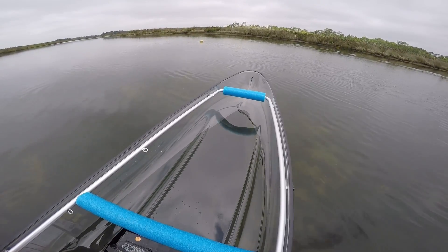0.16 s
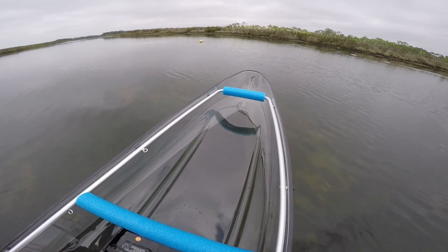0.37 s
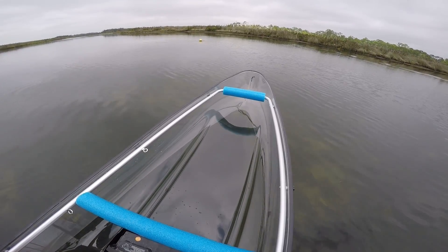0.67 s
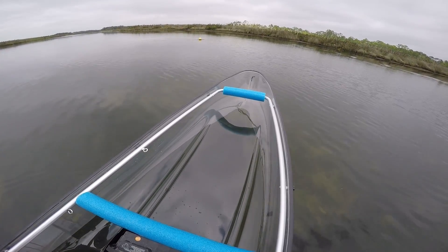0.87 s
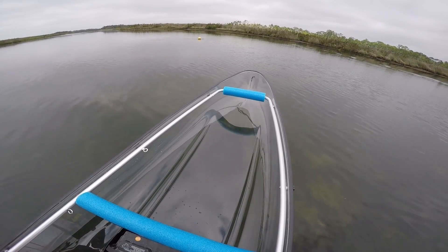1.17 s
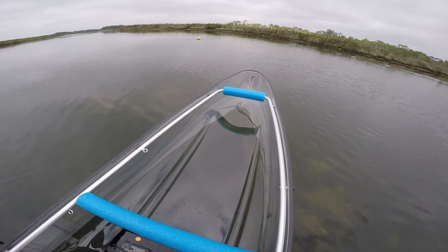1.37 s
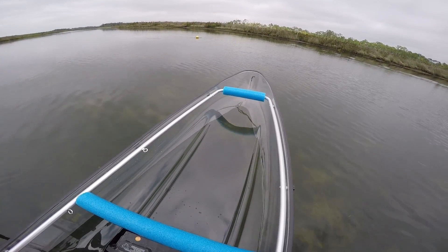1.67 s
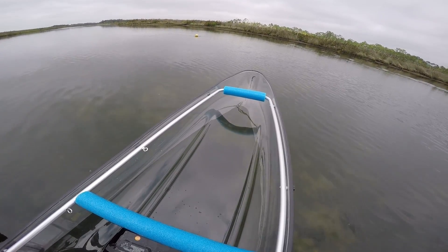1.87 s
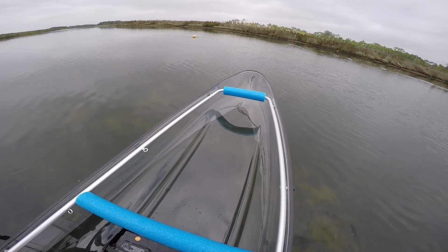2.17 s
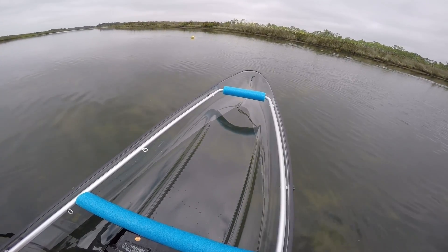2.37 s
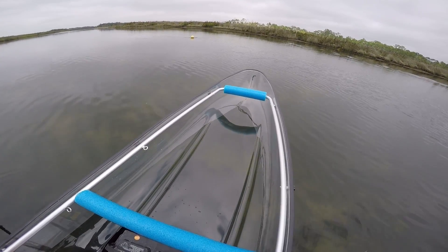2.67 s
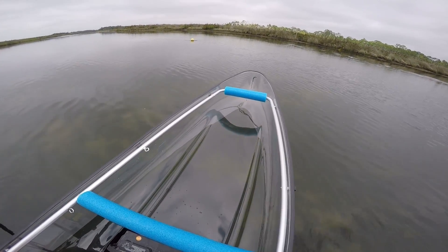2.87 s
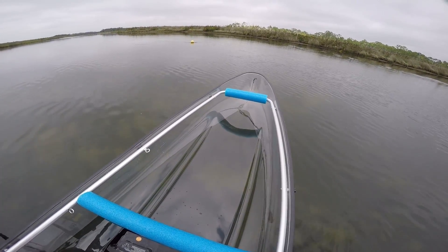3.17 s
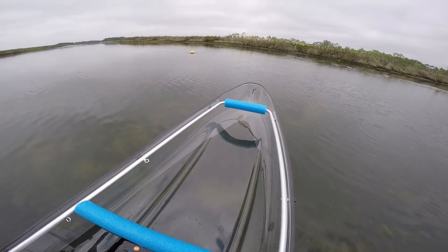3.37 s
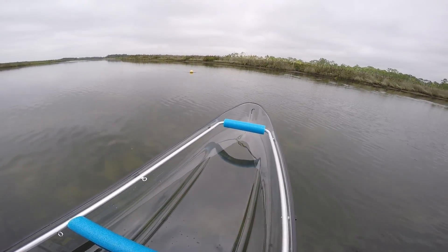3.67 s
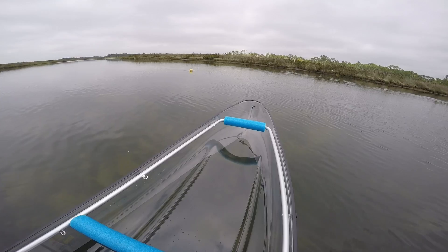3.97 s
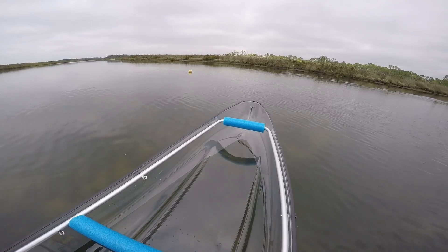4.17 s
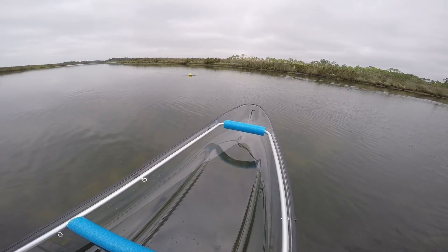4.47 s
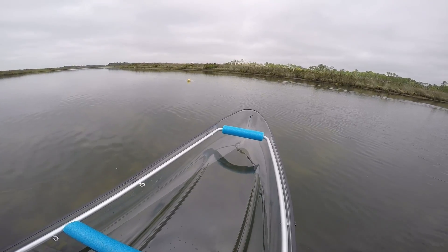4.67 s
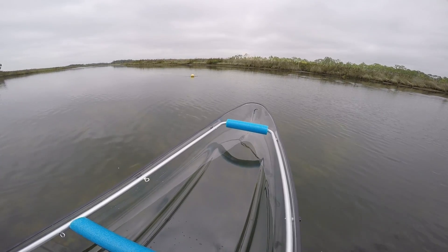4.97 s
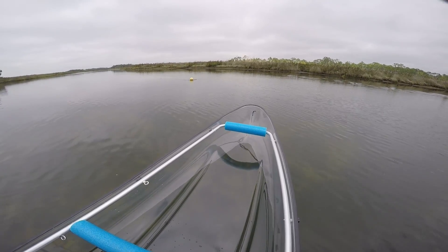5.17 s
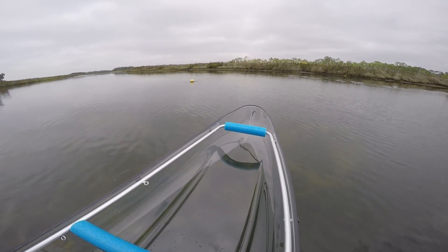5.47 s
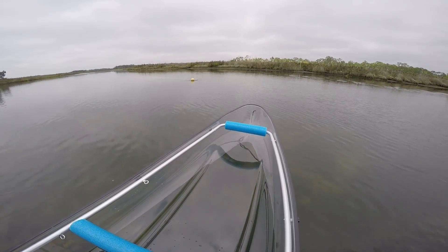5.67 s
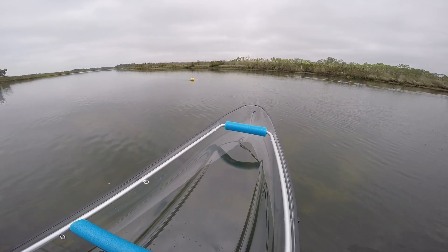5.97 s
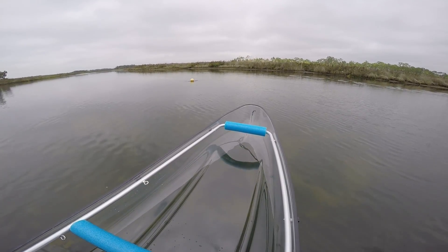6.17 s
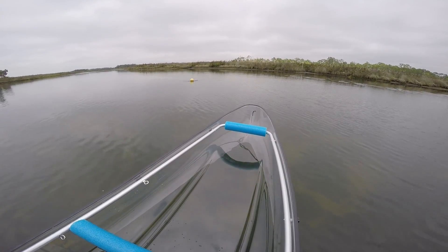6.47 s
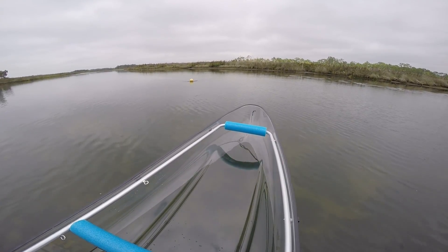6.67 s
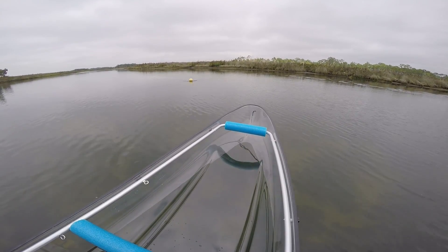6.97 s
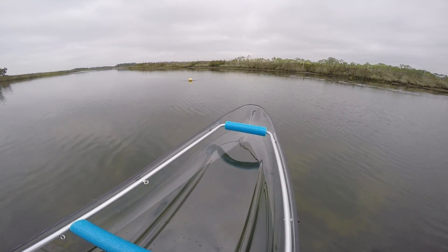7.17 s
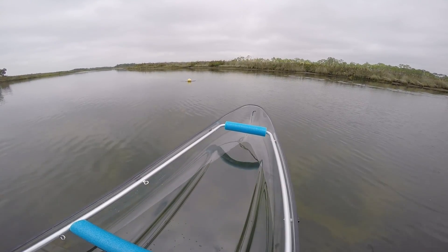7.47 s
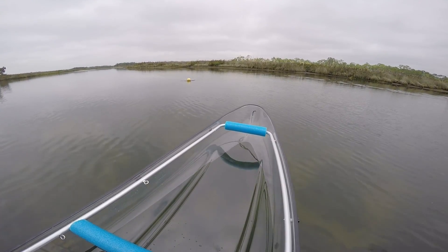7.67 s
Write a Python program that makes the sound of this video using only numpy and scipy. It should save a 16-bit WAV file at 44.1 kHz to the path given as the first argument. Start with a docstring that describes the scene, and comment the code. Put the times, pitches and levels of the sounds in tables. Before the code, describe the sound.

Gear is shifted inside a plastic canoe: irregular sharp clatter, brief scrapes and boomy thuds, with faint hiss before and after.

```python
"""Gear shifted about in a plastic canoe

A clear plastic canoe floats on a calm river, with the microphone mounted on its hull. After a few faint knocks,
someone shifts gear for about three seconds: noisy bursts through plastic resonances clack, random slips scrape,
blunt blows ring the hull modes, and damped swings pass the thumps on through the mount.
The last blows leave the hull humming over faint filtered-noise hiss and a thin whine of steady sines."""
import sys
import numpy as np
from scipy import signal
from scipy.fft import rfft, irfft, next_fast_len
from scipy.io import wavfile

SR = 44100
rng = np.random.default_rng(int(sys.argv[2]) if len(sys.argv) > 2 else 0)


def master(y):
    """Save y as 16-bit WAV."""
    cut = np.clip(np.atleast_2d(y).T, -1, 1)
    pcm = np.round(cut * 32767)  # scale
    wavfile.write(sys.argv[1], SR, pcm.astype(np.int16))


N = 345126
TIME = np.arange(N) / SR


# Hard plastic clacks. Each row: start in seconds, level in dB before colour,
# brightness in dB per octave about the clack range.
CLACKS = [(2.5269, -29.5, -2), (2.8006, -44.5, 4), (3.0749, -37.5, -3), (3.0858, -30.5, -1),
          (3.098, -21.5, -1.5), (3.3013, -58, 7.5), (3.3675, -28, 3), (3.38, -53, 12.5), (3.3943, -42.5, 2),
          (3.5072, -54.5, 5.5), (3.5222, -62.5, 12), (3.616, -67, 10), (3.86, -46.5, 3.5),
          (4.0768, -11.5, 1), (4.0996, -13.5, -4), (4.6208, -66, 8), (4.635, -60, 9), (4.6462, -56, 7),
          (5.0106, -51.5, 1.5), (5.0635, -23.5, 3.5), (5.0821, -17, 1.5), (5.111, -30, -4),
          (5.165, -13, 0.5), (5.1769, -13.5, -7.5), (5.194, -30.5, 8), (5.2041, -11.5, -3)]
# Colour shared by all clacks: body, clack, snap and tick in dB.
CLACK_COLOUR_DB = [-15, -0.5, -6, -19]
# Body, clack, snap and tick ranges. Each row: low edge in Hz, high edge in Hz.
FITTING_RANGES = [(280, 880), (1090, 3000), (3000, 6100), (7000, 14000)]
# Resonances of the plastic fittings. Each row: frequency in Hz, width in Hz, relative level in dB.
FITTINGS = [(644, 110, -12), (1580, 340, 0.5), (2184, 510, 2), (2478, 69, 2.5), (3650, 130, 5),
            (4190, 290, 9), (5230, 170, 1.5), (14400, 500, -8)]
# Faint ping of the rim. Each row: frequency in Hz, relative level in dB, free 60 dB decay in seconds.
RIM_MODES = [(1244, -14, .05), (1857, -25, .24)]


def clacks(rim_db=-3.0):
    """Hard parts snap against each other close to the microphone, and set the rim pinging."""
    out = np.zeros(N)
    for start, db, brightness in CLACKS:
        force = contact(crack_s=0.0012, crack=0.19, tail_db=-38.5, tail_s=0.0081)
        rattle = resonate(force, FITTINGS, direct=0.7)
        ranges_db = db + tilted(CLACK_COLOUR_DB, brightness)
        add(out, start, colour(rattle, ranges_db, FITTING_RANGES))
    starts, levels_db, _ = np.transpose(CLACKS)
    return out + hull(starts, levels_db + rim_db, RIM_MODES, held_t60=0.1)


# Knocks on the hull; a longer contact is duller. Each row: start in seconds, level in dB before colour
# and softness, contact time in seconds, boom in dB.
KNOCKS = [(1.339, -47.5, 0.00063, -48), (1.361, -55, .0012, -38), (1.873, -56.5, 0.0017, -56),
          (2.5694, -41, 0.00037, -30), (2.801, -38, 0.0013, -33.5), (2.846, -29.5, 0.0036, -61),
          (3.1721, -15.5, 0.00051, -30), (3.225, -50, .001, -25.5), (3.3204, -43.5, 0.00064, -23.5),
          (3.4204, -40, 0.0028, -29), (3.5873, -42.5, 0.0019, -38), (3.6852, -39, 0.0027, -43),
          (3.8453, -33.5, 0.00038, -36), (3.8758, -33.5, 0.00016, -35), (3.8842, -25.5, 0.0022, -17.5),
          (4.004, -43, 0.00088, -31.5), (4.0286, -19, 0.00012, -26), (4.1286, -21.5, 0.00031, -14.5),
          (4.2083, -42, 0.0017, -31.5), (4.295, -41, 0.0011, -34), (4.3063, -27.5, 0.0023, -23),
          (4.4414, -55.5, 0.00089, -36), (4.8199, -13, 0.00067, -30.5), (4.824, -20, 0.001, -18),
          (4.8863, -20.5, 0.00027, -26.5), (5.1695, -8.5, 0.00018, -13), (5.1774, -28, 0.0012, -38),
          (5.231, -26.5, 0.0011, -30)]
# Colour shared by all knocks: body, clack and snap in dB.
KNOCK_COLOUR_DB = [0, -3, -5]
# Body, clack and snap of the duller hull. Each row: low edge in Hz, high edge in Hz.
HULL_RANGES = [(250, 860), (1000, 2000), (2350, 6200)]
# Broad resonances of a struck hull panel. Each row: frequency in Hz, width in Hz, relative level in dB.
PANEL = [(667, 200, -13), (1270, 240, -5), (1570, 200, 3.5), (4410, 67, 0.5)]
# Hull wall modes. Each row: frequency in Hz, relative level in dB, free 60 dB decay in seconds.
WALL_MODES = [(244, -6, .08), (290, -6, .07), (437, -5, .09), (573, -3, .08), (692, -1.5, .08),
              (815, -9, .08)]
# Modes of the whole hull on the water. Each row: frequency in Hz, level relative to the boom in dB,
# free 60 dB decay in seconds.
BOOM_MODES = [(102, -9, .85), (148, -3, .42)]
# The struck panel gives way with a short thud, whose slow bending wave arrives late; level relative to the boom.
THUD_HZ, THUD_DB, THUD_CYCLES, THUD_DELAY_S = 177.3, 3, 0.35, 0.0022


def knocks(wall_db=-5.0, rim_db=-3):
    """Blunter blows: a dull crack and thud of the panel, the ringing wall and rim, then the boom of the boat."""
    out = np.zeros(N)
    for start, db, contact_s, boom_db in KNOCKS:
        force = contact(crack_s=0.0012, crack=0.16, tail_db=-40, tail_s=0.012)
        crack = resonate(force, PANEL, direct=0.5)
        ranges_db = db + np.array(KNOCK_COLOUR_DB) + softness_db(contact_s, centres(HULL_RANGES))
        add(out, start, colour(crack, ranges_db, HULL_RANGES))
        add(out, start + THUD_DELAY_S, swing(THUD_HZ, boom_db + THUD_DB, THUD_CYCLES))
    starts, levels_db, contacts_s, booms_db = np.transpose(KNOCKS)
    rim_levels_db = levels_db + rim_db + softness_db(contacts_s, RIM_MODES[0][0])
    out += hull(starts, levels_db + wall_db, WALL_MODES, held_t60=0.11)
    out += hull(starts, rim_levels_db, RIM_MODES, held_t60=0.18)
    return out + hull(starts + 0.003, booms_db, BOOM_MODES, held_t60=0.15)


# A hand damps the hull while the gear is handled: from and until, in seconds.
HELD = (2.5, 5.15)


def hull(starts, levels_db, modes, held_t60):
    """Every blow strikes each mode with a strength of its own; when held, it rings no longer than held_t60."""
    out = np.zeros(N)
    chance_db = rng.uniform(-2, 2, (len(starts), len(modes)))
    at = np.round(starts * SR).astype(int)
    held = (starts > HELD[0]) & (starts < HELD[1])
    for k, (hz, db, t60) in enumerate(modes):
        strength = from_db(levels_db + db + chance_db[:, k])
        for chosen, decay in (held, min(t60, held_t60)), (~held, t60):
            force = np.zeros(N)
            force[at] = chosen * strength
            out += (-1) ** k * ring(force, hz, decay)  # neighbouring modes start in opposite directions
    return out


# Strokes of plastic sliding on plastic. Each row: crest in seconds, rise scale in seconds,
# level in dB before colour, brightness in dB per octave about the clack range.
SCRAPES = [(2.533, 0.0019, -20, 1.5), (2.546, 0.0038, -25, 2.5), (2.65, 0.011, -37.5, 0.5),
           (2.68, 0.018, -39.5, -0.5), (2.807, 0.0067, -43.5, -4.5), (2.892, 0.015, -32.5, -1),
           (2.957, 0.0049, -25.5, 3), (3.083, 0.0038, -34.5, 4), (3.16, 0.036, -43, -0.5),
           (3.374, .007, -40, -6), (3.56, .05, -65, 6.5), (3.92, 0.022, -58, 4.5), (4.03, 0.012, -35, -1),
           (4.121, 0.0068, -30, -4), (4.261, .08, -61.5, 1), (4.905, 0.0073, -45, 1.5),
           (5.06, .035, -57.5, 1), (5.177, 0.012, -29, 1), (5.223, 0.008, -29, 2.5)]
# Colour shared by all strokes: body, clack, snap and tick in dB.
SCRAPE_COLOUR_DB = [-4, 2, -5.5, -20.5]
FALL_OVER_RISE = 1.2  # a stroke dies more slowly than it starts
# Faint rubbing while the gear is handled, before colour, and how it eases off.
RUB_DB, RUB_EASE_DB_PER_S = -59.5, 10.5


def scrapes(slips_per_s=2500, grain_db=2.0, catch_db=3.5, shift_db=-0.5):
    """Tiny slips of uneven size excite the fittings; the sliding part keeps catching and letting go."""
    sizes = from_db(grain_db * np.minimum(rng.exponential(1, N), 3))
    slips = (rng.random(N) < slips_per_s / SR) * sizes * rng.choice([-1, 1], N)
    catching = from_db(catch_db * wander(rate_hz=250))
    force = catching * (rms_one(slips) + 0.5 * rng.standard_normal(N))

    # as the contact point moves, it favours one resonance and then another
    friction = 0.5 * force
    for mode in FITTINGS:
        favour = from_db(shift_db * wander(rate_hz=64))
        friction = friction + favour * resonate(force, [mode], direct=0)

    coarse = TIME[::20]  # strokes are drawn on every 20th sample
    rub = handling()[::20] * from_db(RUB_DB - RUB_EASE_DB_PER_S * (coarse - HELD[0]))
    power = np.outer(from_db(SCRAPE_COLOUR_DB), rub) ** 2
    for crest, rise, db, brightness in SCRAPES:
        away = np.abs(coarse - crest) / np.where(coarse < crest, rise, rise * FALL_OVER_RISE)
        gains = from_db(db + tilted(SCRAPE_COLOUR_DB, brightness))
        power = power + np.outer(gains ** 2, np.exp(-1.3 * away ** 1.2))

    out = np.zeros(N)
    for range_power, edges in zip(power, FITTING_RANGES):
        level = np.interp(TIME, coarse, np.sqrt(range_power))
        out += level * rms_one(band(friction, edges))
    return out


# Squeaks of a fitting under load. Each row: crest in seconds, length scale in seconds, rms at the crest in dB.
SQUEAKS = [(4.026, 0.0069, -42), (5.17, 0.0024, -18.5), (5.222, 0.0077, -28.5), (5.235, 0.0028, -30),
           (5.246, .003, -39)]


def squeaks(hz=4380, waver_hz=70):
    """Friction briefly locks on to one resonance, a sine of wavering pitch."""
    load = sum(from_db(db) * np.exp(-((TIME - crest) / length) ** 2) for crest, length, db in SQUEAKS)
    pitch_hz = hz + waver_hz * wander(rate_hz=600)
    return load * np.sqrt(2) * np.sin(2 * np.pi * np.cumsum(pitch_hz) / SR)


# The hands take hold and let go over these times.
HANDLING_ATTACK_S, HANDLING_RELEASE_S = 0.08, 0.11


def handling():
    """How busy the hands are, 0 to 1: they take hold, work, and let go."""
    take_hold = np.clip((TIME - HELD[0]) / HANDLING_ATTACK_S, 0, 1)
    let_go = np.exp(-np.maximum(TIME - HELD[1], 0) / HANDLING_RELEASE_S)
    return take_hold * let_go


# Jolts of the mount. Each row: start in seconds, pitch in Hz, envelope peak in dB.
JOLTS = [(2.546, 39, -12), (2.806, 67, -11.5), (2.962, 29.8, -13.5), (3.097, 62, -7.5), (3.387, 34, -6.5),
         (4.078, 58, -4), (4.645, 24.5, -4.5), (5.083, 55.4, -15), (5.171, 55.1, -3.5), (5.206, 75, -13)]
JOLT_CYCLES = 0.16  # cycles until a jolt's envelope is widest
# The boom of a knock also shakes the mount; level relative to the boom.
SHAKE_HZ, SHAKE_DB, SHAKE_CYCLES = 66.4, 1.5, 0.3
# Spectrum of the mount's rocking. Each row: frequency in Hz, relative density in dB per Hz.
RUMBLE = [(12, -30), (22, 6), (40, 1.5), (85, -8.5), (150, -18), (250, -26.5), (500, -65.5)]
# Rocking at rest, rocking as the handling begins, and how that eases off.
CALM_DB, ROCK_DB, ROCK_EASE_DB_PER_S = -50.5, -24, 3
ROCK_TOP_HZ = 89  # the hands move the mount only slowly


def mount(lump_db=3.5):
    """The mount rocks unevenly, more while gear is handled, and swings briefly at each jolt and knock."""
    eased_db = ROCK_DB - ROCK_EASE_DB_PER_S * (TIME - HELD[0])
    rocking = handling() * from_db(eased_db + lump_db * wander(rate_hz=39))
    out = from_db(CALM_DB) * shaped_noise(RUMBLE)
    out = out + rocking * band(shaped_noise(RUMBLE), [12, ROCK_TOP_HZ], order=2)
    for start, hz, db in JOLTS:
        add(out, start, swing(hz, db, JOLT_CYCLES))
    for start, _, _, boom_db in KNOCKS:
        add(out, start, swing(SHAKE_HZ, boom_db + SHAKE_DB, SHAKE_CYCLES))
    return out


# Spectrum of the hiss. Each row: frequency in Hz, relative density in dB per Hz.
HISS = [(76, -23), (130, -0.5), (224, -10.5), (491, -10.5), (765, -15.5), (3610, -17.5), (5960, -20),
        (6340, -20.5), (7300, -23), (11600, -27.5), (13100, -24.5), (15100, -35), (16000, -43)]
HISS_DB = -65.5  # rms of the part shared by both channels
# Thin electronic whine. Each row: frequency in Hz, rms in dB.
WHINE = [(6293, -82.5), (6322, -87), (12618, -84.5)]


def hiss(side_db=-22.0):
    """Steady shaped noise and sine whine, nearly alike in both channels."""
    whine = sum(from_db(db) * np.sqrt(2) * np.sin(2 * np.pi * hz * TIME) for hz, db in WHINE)
    side = from_db(side_db) * rms_one(band(rng.standard_normal(N), [60, 15000], order=1))
    return whine + from_db(HISS_DB) * (shaped_noise(HISS) + side * np.array([[1], [-1]]))


def contact(crack_s, crack, tail_db, tail_s):
    """The force of a blow: a pulse, a short crack and a weak diffuse tail."""
    t = TIME[:SR // 6]
    envelope = crack * np.exp(-t / crack_s) + from_db(tail_db) * np.exp(-t / tail_s)
    force = rng.standard_normal(len(t)) * envelope
    force[0] += 1
    return force


def softness_db(contact_s, hz):
    """A contact passes little above one cycle per contact time."""
    return -10 * np.log10(1 + (hz * contact_s) ** 8)


def resonate(force, resonances, direct):
    """A part adds its resonances to the force that passes through it."""
    out = direct * force
    for hz, width, db in resonances:
        r = np.exp(-np.pi * width / SR)
        poles = [1, -2 * r * np.cos(2 * np.pi * hz / SR), r * r]
        out = out + from_db(db) * (1 - r * r) / 2 * signal.lfilter([1, 0, -1], poles, force + 1e-18)
    return out


def ring(force, hz, t60):
    """A unit click sets a decaying sine of initial height 1 ringing."""
    r = from_db(-60 / (t60 * SR))
    w = 2 * np.pi * hz / SR
    return signal.lfilter([0, np.sin(w)], [1, -2 * r * np.cos(w), r * r], force + 1e-18)


def swing(hz, db, cycles):
    """A heavily damped swing whose envelope is widest after so many cycles."""
    turns = hz * TIME[:SR // 4]
    envelope = turns / cycles * np.exp(1 - turns / cycles)
    return -from_db(db) * envelope * np.sin(2 * np.pi * turns)


def colour(sound, levels_db, ranges):
    """Give a blow its level in each range, its whole energy counted as rms over 5 ms."""
    out = np.zeros(len(sound))
    for db, edges in zip(levels_db, ranges):
        part = band(sound, edges, order=4)
        out += from_db(db) * part * np.sqrt(0.005 * SR / np.sum(part ** 2))
    return out


def tilted(colour_db, brightness):
    """Tip a colour about the clack range by so many dB per octave."""
    hz = centres(FITTING_RANGES)
    return np.array(colour_db) + brightness * np.log2(hz / hz[1])


def centres(ranges):
    """Geometric middle of each range in Hz."""
    return np.sqrt(np.prod(ranges, axis=1))


def wander(rate_hz):
    """A random course of straight lines between knots, drawn with spread 1 and clipped at 2."""
    knots = np.clip(rng.standard_normal(N // 100), -2, 2)
    return np.interp(TIME * rate_hz, np.arange(len(knots)), knots)


def shaped_noise(spectrum):
    """Noise of a given spectrum, rms 1."""
    hz, db = np.transpose(spectrum)
    size = next_fast_len(N)
    bins = np.maximum(np.fft.rfftfreq(size, 1 / SR), 1)
    gains = from_db(np.interp(np.log(bins), np.log(hz), db))
    return rms_one(irfft(rfft(rng.standard_normal(size)) * gains, size)[:N])


def band(x, edges, order=3):
    """Causal band-pass between two edges in Hz."""
    return signal.sosfilt(signal.butter(order, edges, "band", fs=SR, output="sos"), x + 1e-18)


def from_db(db):
    """Decibels to gain."""
    return 10 ** (np.asarray(db) / 20)


def rms_one(x):
    """Scale to rms 1."""
    return x / np.sqrt(np.mean(x ** 2) + 1e-20)


def add(track, start, sound):
    """Mix a short sound in at a start in seconds."""
    at = round(start * SR)
    track[at:at + len(sound)] += sound[:N - at]


def scene(side_db=-41.0, side_delay_s=0.003):
    """Everything reaches the microphone through the hull, so it sits almost exactly in the centre."""
    boat = clacks() + knocks() + scrapes() + squeaks()
    # a faint, slightly delayed copy, opposite in the two channels, gives a little width
    side = from_db(side_db) * np.interp(TIME - side_delay_s, TIME, boat)
    return boat + side * np.array([[1], [-1]]) + mount() + hiss()


CUTOFF_HZ = 15800


def record(dry):
    """The hardest peaks overload and are rounded; a steep low-pass cuts the top."""
    rounded = dry / (1 + dry ** 6) ** (1 / 6)
    return signal.sosfilt(signal.ellip(10, 0.1, 80, CUTOFF_HZ, fs=SR, output="sos"), rounded)


dry = scene()
out = record(dry)
master(out)
```